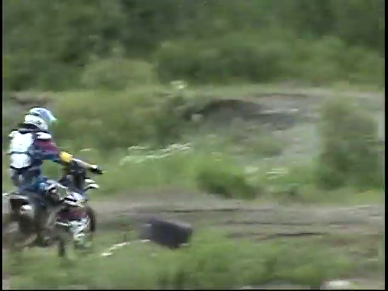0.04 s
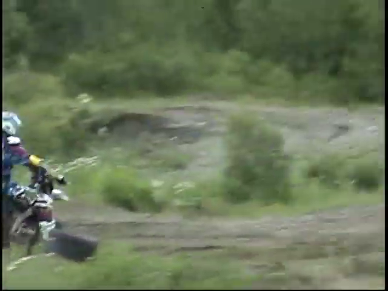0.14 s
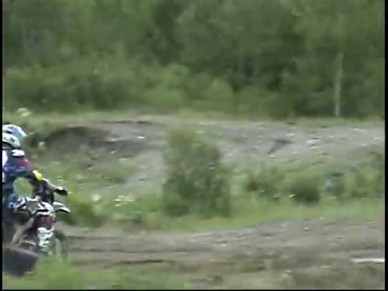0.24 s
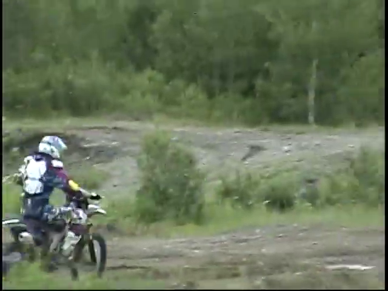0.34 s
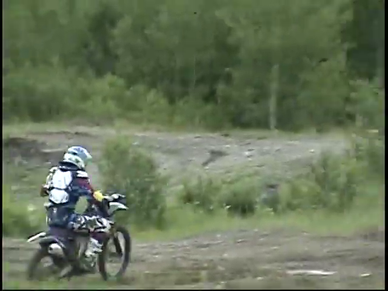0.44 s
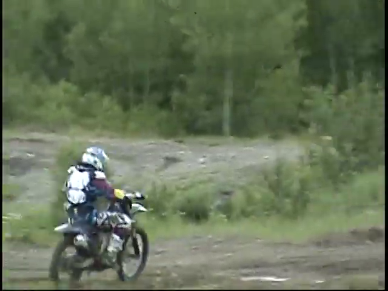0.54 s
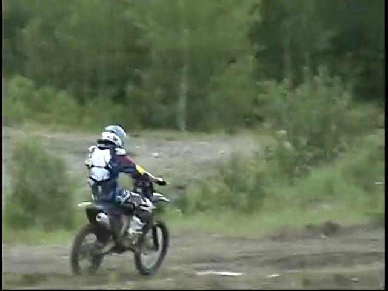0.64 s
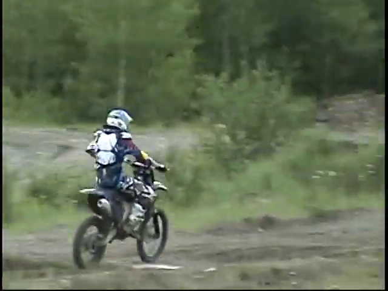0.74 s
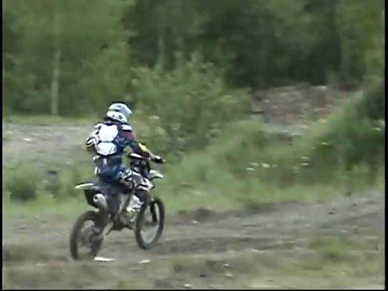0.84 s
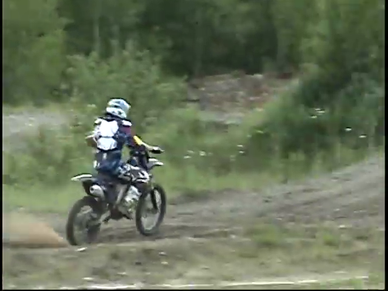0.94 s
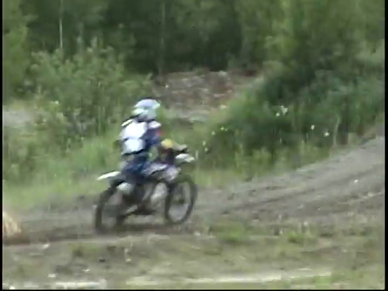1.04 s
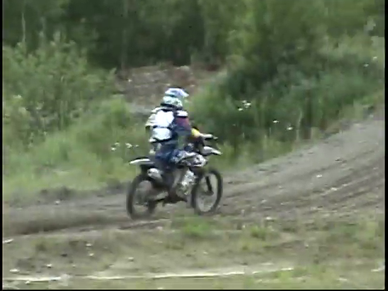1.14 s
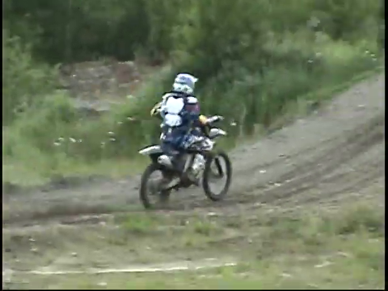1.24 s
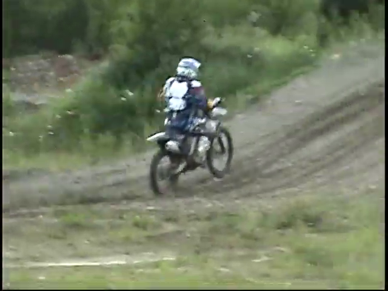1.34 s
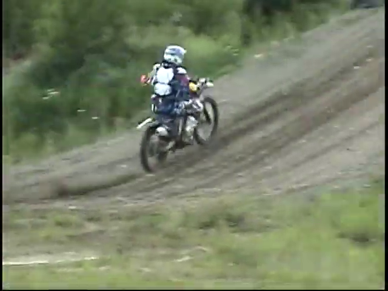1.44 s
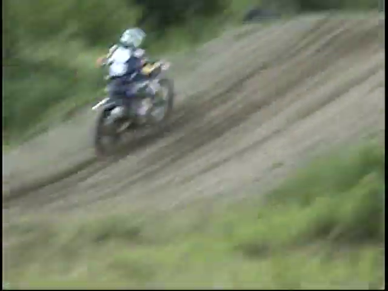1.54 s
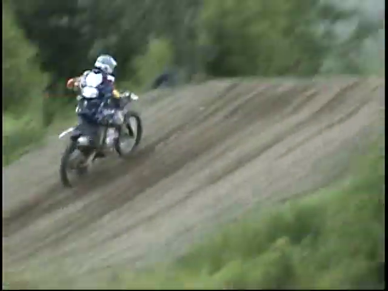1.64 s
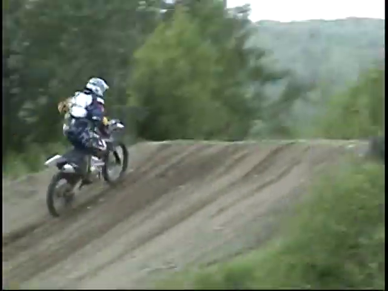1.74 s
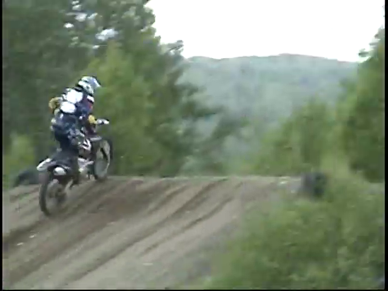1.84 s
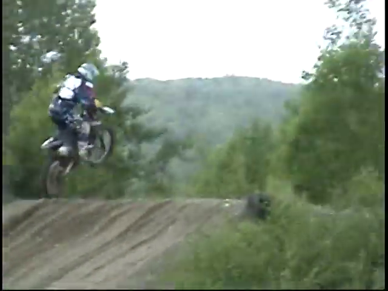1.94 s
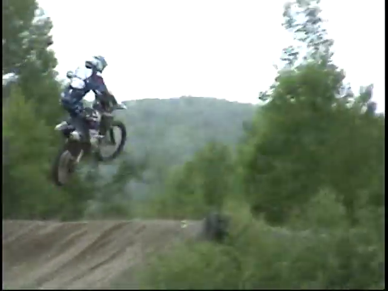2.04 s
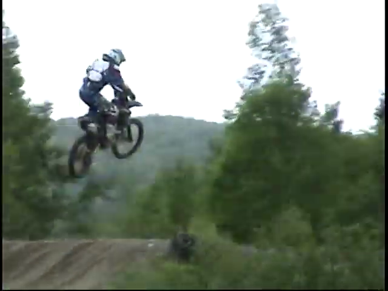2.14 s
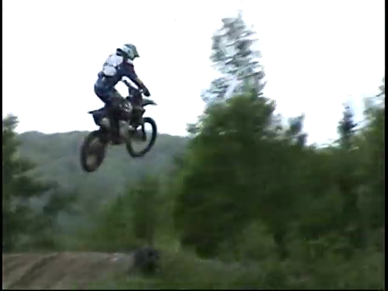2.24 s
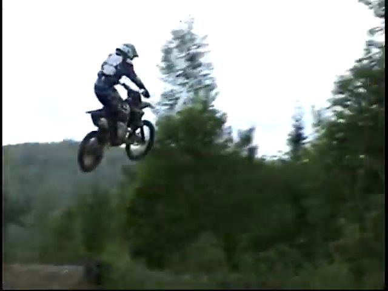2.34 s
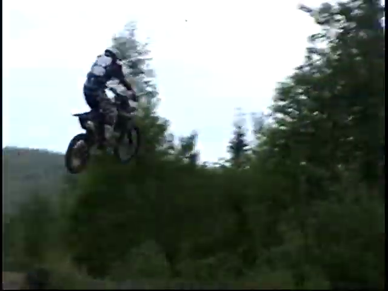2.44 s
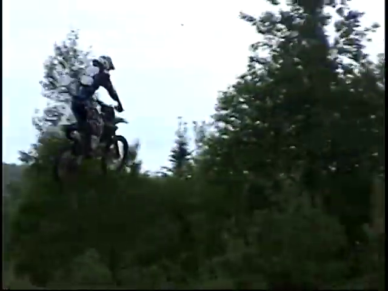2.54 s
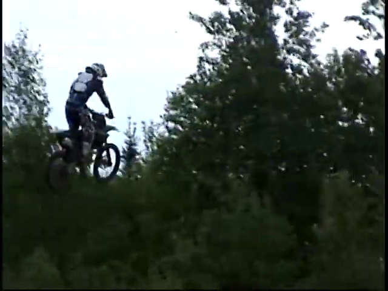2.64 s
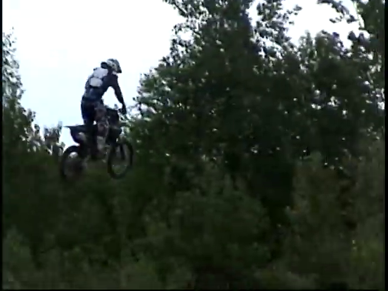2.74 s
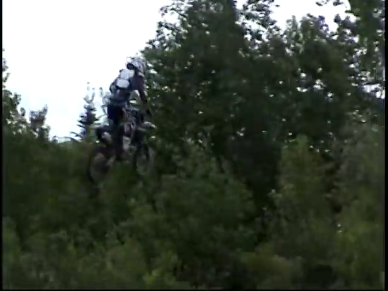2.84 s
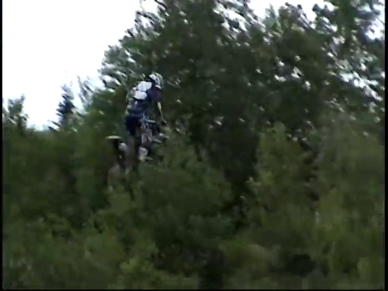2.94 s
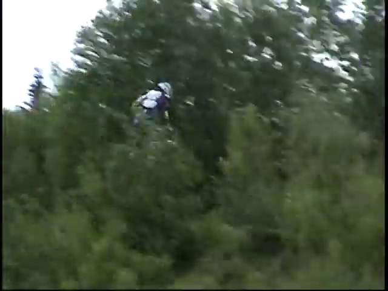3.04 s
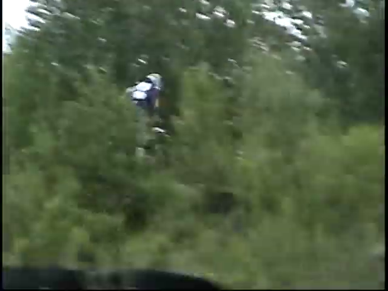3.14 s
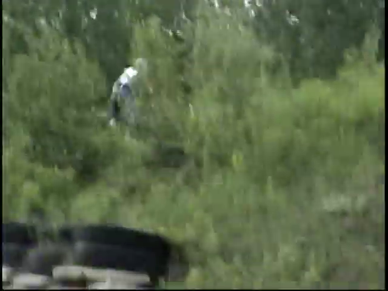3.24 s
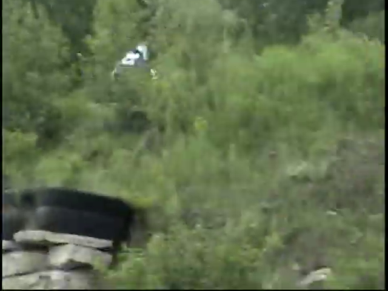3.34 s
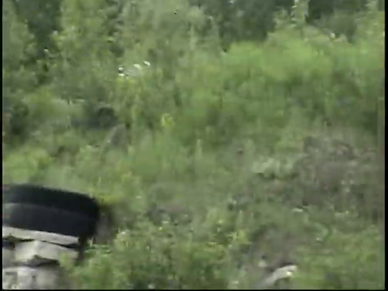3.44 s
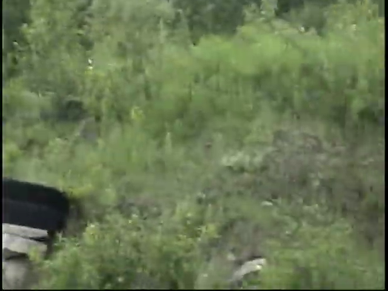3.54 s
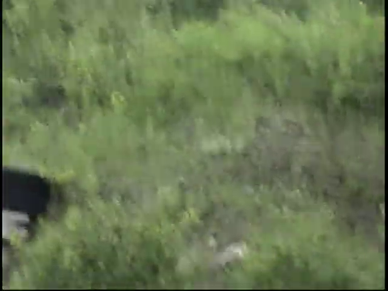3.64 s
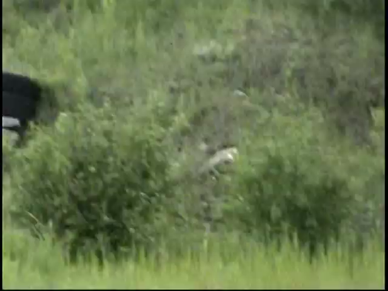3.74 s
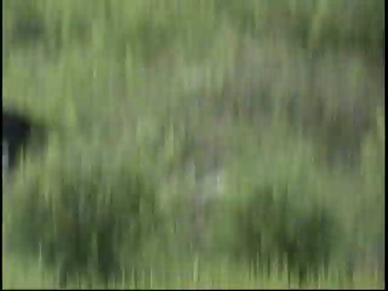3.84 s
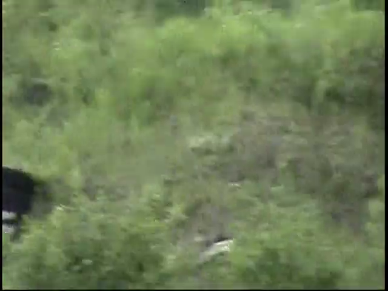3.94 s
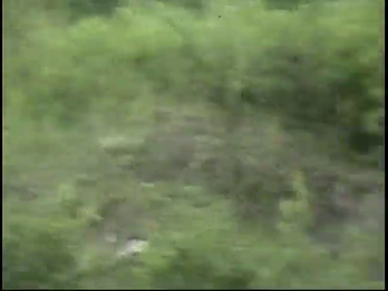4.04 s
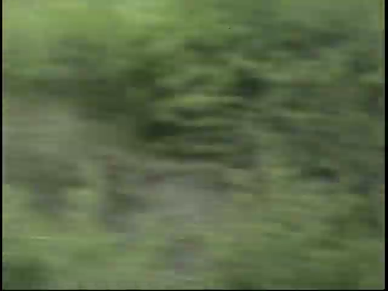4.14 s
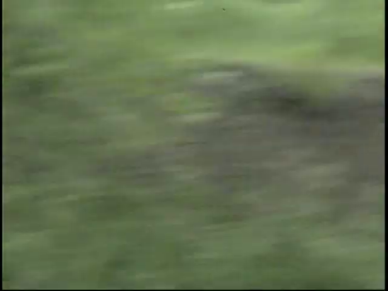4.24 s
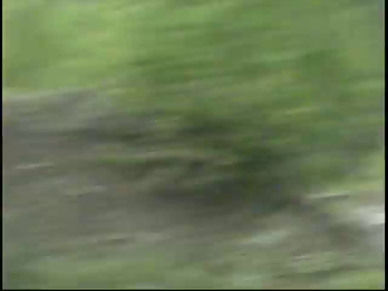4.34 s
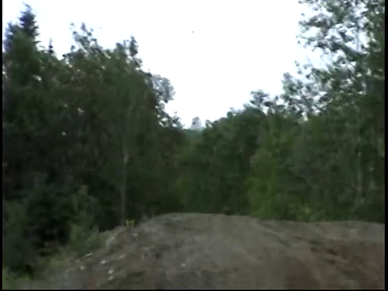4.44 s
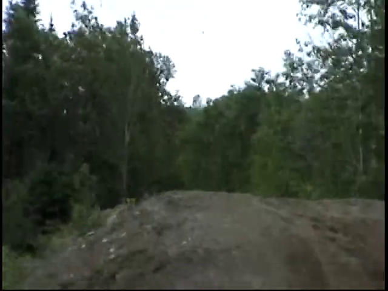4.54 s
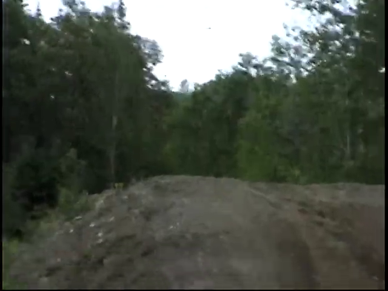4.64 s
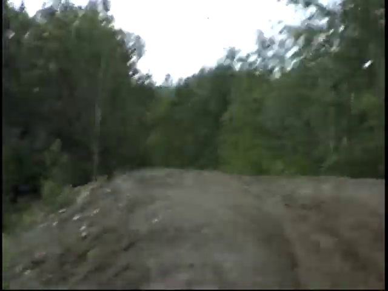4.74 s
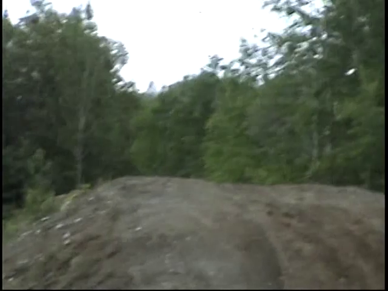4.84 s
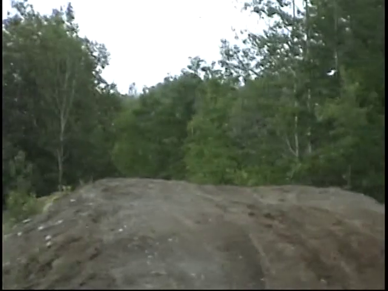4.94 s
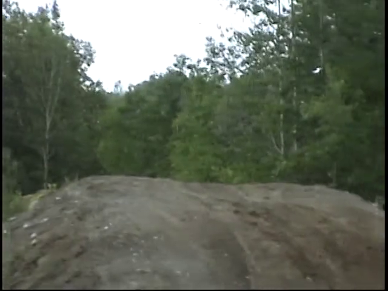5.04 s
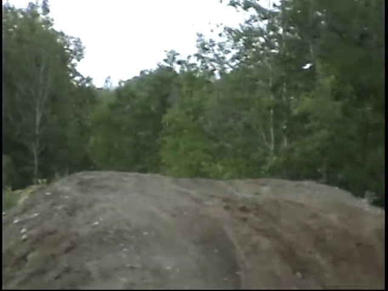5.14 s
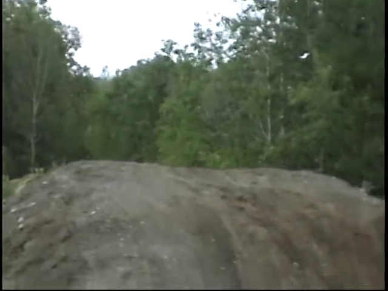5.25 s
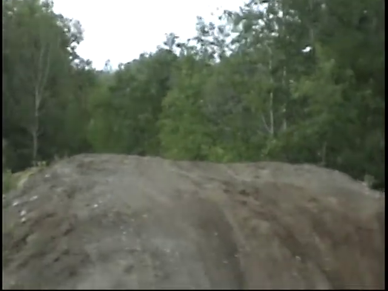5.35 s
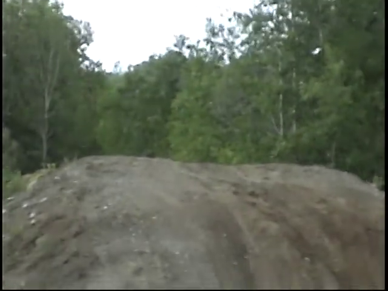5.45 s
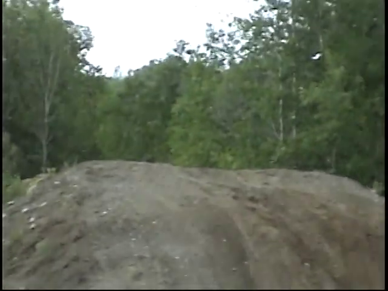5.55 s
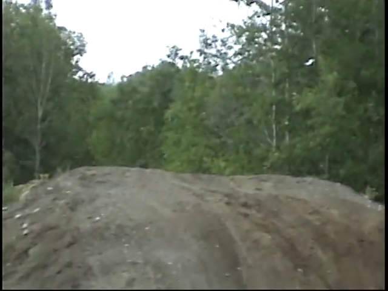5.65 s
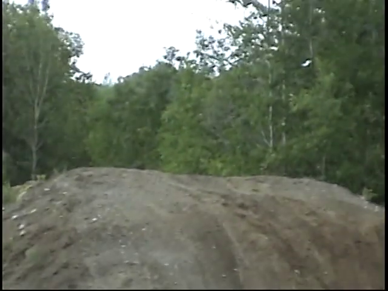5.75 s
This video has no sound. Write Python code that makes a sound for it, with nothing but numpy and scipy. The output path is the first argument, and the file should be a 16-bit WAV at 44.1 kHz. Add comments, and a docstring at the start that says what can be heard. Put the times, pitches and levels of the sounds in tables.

```python
"""A single-cylinder four-stroke dirt bike climbs a ramp over wind buffeting and camera hiss: each firing is a low
boom of summed orders from the silencer and a crack of filtered shock and turbulence from the tailpipe, and trees
answer with a roar of shaped noise. It jumps with the throttle shut, leaving soft pops, blips the throttle, then
coasts behind a bank as knocks of chain and frame, decaying sines with grit, mark a landing. After an edit it pulls
hard again, further off and mostly heard as scattered sound."""
import sys
import numpy as np
from scipy import signal
from scipy.fft import rfft, irfft, next_fast_len
from scipy.io import wavfile
from scipy.ndimage import uniform_filter1d, map_coordinates

SR = 44100
rng = np.random.default_rng(int(sys.argv[2]) if len(sys.argv) > 2 else 0)


def waveform_to_disk(signal):
    """Save audio, clipped to [-1, 1], as 16-bit WAV at the path in sys.argv[1]."""
    frames = np.transpose(np.atleast_2d(signal))
    scaled = np.clip(frames, -1, 1) * 32767
    samples = np.round(scaled).astype(np.int16)
    wavfile.write(sys.argv[1], SR, samples)


N = 256220
TIME = np.arange(N) / SR
SIZE = next_fast_len(N + 8192)  # spectrum length, padded so that ringing does not wrap round
HZ = np.fft.rfftfreq(SIZE, 1 / SR)
EDIT_S = 4.4  # from here on the bike is further off


def amp(db):
    """Logarithmic level: decibels to gain."""
    return 10 ** (np.asarray(db) / 20)


def steady(x, span=0.17):
    """Power normalisation: x with its running level over span seconds brought to rms 1."""
    width = int(span * SR)
    power = uniform_filter1d(uniform_filter1d(x ** 2, width), width)
    return x / np.sqrt(np.abs(power) + 1e-12)


def along(points):
    """Logarithmic frequency scale: (Hz, value) points interpolated over log frequency."""
    hz, value = np.transpose(points)
    return np.interp(np.log(HZ + 1), np.log(hz + 1), value)


def curves(rows):
    """Slow modulation: one interpolated value per sample for each column after the time."""
    s, *columns = np.transpose(rows)
    return [np.interp(TIME, s, column) for column in columns]


def filtered(x, response):
    """Linear filtering: the spectrum of x times a frequency response."""
    return irfft(rfft(x, SIZE) * response, SIZE)[..., :N]


def causal(points):
    """Causality: the minimum-phase response of a (Hz, dB) spectrum, so that pulses ring after they start."""
    cepstrum = irfft(np.log(amp(np.maximum(along(points), -50))), SIZE)
    # folding the cepstrum onto positive times gives minimum phase
    cepstrum[1:SIZE // 2] *= 2
    cepstrum[SIZE // 2 + 1:] = 0
    return np.exp(rfft(cepstrum))


def wobble(rate):
    """Random fluctuation: a smooth curve through rate random knots a second."""
    knots = rng.standard_normal(int(N * rate / SR) + 4)
    return map_coordinates(knots, [TIME * rate])


def spread(alike):
    """Interchannel coherence: left and right noises as alike as the 0-1 curve says."""
    turn = np.arccos(np.clip(alike, -1, 1)) / 2 * np.ones_like(HZ)
    shares = np.array([np.cos(turn), np.sin(turn)])
    mid, side = filtered(rng.standard_normal((2, N)), shares)
    return np.array([mid + side, mid - side])


def impulses(at_s, size):
    """Fractional delay: one impulse per time, shared between the two nearest samples."""
    at = np.clip(at_s * SR, 0, N - 2)
    before = at.astype(int)
    late = at - before
    return np.bincount(before, size * (1 - late), N) + np.bincount(before + 1, size * late, N)


# Engine speed. Each row: time in seconds, firings per second.
FIRING_RATE = [(0.0, 79.98), (0.05, 73.29), (0.1, 72.5), (0.2, 63.4), (0.25, 68.03), (0.35, 83.1),
               (0.4, 81.62), (0.52, 95.1), (0.58, 75.57), (0.63, 88.35), (0.69, 70.89), (0.77, 68.4),
               (0.95, 92.44), (1.07, 101.2), (1.2, 85.6), (1.25, 84.3), (1.3, 76.11), (1.4, 78.71),
               (1.46, 85.49), (1.51, 80.39), (1.58, 88.49), (1.64, 80.93), (1.8, 78.6), (1.95, 79.9),
               (2.0, 83.57), (2.17, 80.05), (2.22, 65.59), (2.3, 71.0), (2.55, 54), (3.1, 33.7),
               (3.2, 36.64), (3.27, 43.54), (3.33, 55.4), (3.47, 87.6), (3.5, 85.96), (3.53, 56.93),
               (3.57, 54.2), (3.64, 62), (4.0, 46.5), (4.17, 63), (4.22, 57), (4.39, 54), (4.41, 94.08),
               (4.45, 92.39), (4.5, 80.34), (4.66, 69), (4.8, 71), (5.0, 70.8), (5.07, 85.3), (5.13, 83.6),
               (5.18, 89.37), (5.24, 84.03), (5.32, 84.37), (5.38, 75.9), (5.45, 82), (5.5, 80.6),
               (5.6, 92.97), (5.7, 97.51), (5.81, 87)]
FIRST_FIRING = .12  # share of a cycle already turned at the start


def engine_cycle():
    """Phase as the integral of frequency: firing rate in Hz, cycles turned, and the time of each firing."""
    firing_hz, = curves(FIRING_RATE)
    cycle = FIRST_FIRING + np.cumsum(firing_hz) / SR
    fire_s = np.interp(np.arange(1, int(cycle[-1]) + 1), cycle, TIME)
    return firing_hz, cycle, fire_s


# Silencer response. Each row: frequency in Hz, relative level in dB close by, further off, with the throttle shut.
SILENCER_RESPONSE = [(40, -6, -21, -46), (77, -15.5, -14, -11), (100, -14, -10.5, -12.5),
                     (131, 1.5, -10, -5), (158, -6.5, -2, 3.5), (244.5, 2, 1.5, -6.5),
                     (281.5, -1, -4, -9.5), (329.6, -4, -11, -18), (379, -8, -21, -20.5),
                     (490, -21.5, -27, -33), (970, -97, -70, -60)]
# Turbulence under the boom. Each row: frequency in Hz, relative level in dB per Hz.
BOOM_TURBULENCE = [(35, -54), (60, -12), (107, -10.5), (150, -2.5), (265, -1), (411, -12), (560, -17),
                   (730, -51), (1230, -120)]
SHIMMER_DB = 1.3  # each order wavers on its own


def boom(firing_hz, cycle, throttle, tilt_db, count=7):
    """Harmonic series: the silencer passes low firing orders, which meet in one pressure dip a cycle."""
    hz, near_db, far_db, shut_db = np.transpose(SILENCER_RESPONSE)
    log_order = np.log(np.arange(1, count + 1)[:, None] * firing_hz)
    near, far, shut = (np.interp(log_order, np.log(hz), db) for db in (near_db, far_db, shut_db))
    open_db = np.where(TIME > EDIT_S, far, near)
    octaves = log_order / np.log(2)
    gains = amp(throttle * open_db + (1 - throttle) * shut + tilt_db * octaves)
    gains = gains / np.sqrt(np.sum(gains ** 2, axis=0))  # the orders together keep one level
    flutter = 0.0088 * wobble(60)  # cycles
    # further off, an echo from the bank staggers the odd orders and fills the gap between dips
    stagger = 0.29 * (TIME > EDIT_S)
    tone = 0
    for order, gain in enumerate(gains, start=1):
        turn = .75 if order == 1 else .56 - stagger * (order % 2)
        shimmer = amp(SHIMMER_DB * wobble(16))
        wave = np.cos(2 * np.pi * (order * (cycle + flutter) + turn))
        tone = tone + np.sqrt(2) * gain * shimmer * wave
    turbulence = steady(filtered(spread(0.69), amp(along(BOOM_TURBULENCE))))
    return tone + amp(-12.5) * turbulence


def shock_pulses(fire_s, chance):
    """Shock and ground reflection: front times, their sizes, fronts, duller bounces, turbulent bursts."""
    front_s = fire_s - .0019 + .00003 * chance[:, 0]  # just ahead of the dip
    size = amp(0.86 * chance[:, 1])
    front = impulses(front_s, size)
    # the bounce path drifts as the bike moves, which slides the colour of the bark
    path_s = 0.00148 + .00007 * np.interp(fire_s, TIME, wobble(5))
    bounce_s = front_s + path_s + .00004 * chance[:, 2]
    bounce = impulses(bounce_s, size * (0.41 + 0.064 * chance[:, 3]))
    decay = amp(-60 * TIME[:1500] / 0.011)  # 60 dB in 11 ms
    burst = signal.fftconvolve(front, decay)[:N] * rng.standard_normal(N)
    return front_s, size, front, bounce, burst


# Tailpipe resonances. Each row: centre in Hz, width in Hz, relative level in dB.
PIPE_RESONANCES = [(730, 72, -14), (1456, 570, -1.5), (2253, 300, 1), (3130, 1700, -4), (4340, 240, -7)]


def tailpipe():
    """Resonance: parallel second-order modes, with lows and highs rolled off."""
    modes = sum(amp(db) * 1j * HZ * width / (centre * centre - HZ * HZ + 1j * HZ * width)
                for centre, width, db in PIPE_RESONANCES)
    low_cut = (1j * HZ / (350 + 1j * HZ)) ** 2
    high_cut = (6500 / (6500 + 1j * HZ)) ** 4
    return modes * low_cut * high_cut


# Scattered sound. Each row: frequency in Hz, left-right likeness (0-1).
SCATTER_LIKENESS = [(60, .8), (300, 1), (3000, 1), (7000, 0.81), (15000, 0.057)]


def scattered_noise(cycle):
    """Multiple scattering: diffuse noise keeps a faint pulse at the firing rate."""
    throb = 1 + 0.098 * np.cos(2 * np.pi * (cycle - .05))
    waver = amp(1.1 * wobble(26) + 0.6 * wobble(40))
    return spread(along(SCATTER_LIKENESS)) * throb * waver


# Roar with the throttle open. Each row: frequency in Hz, relative level in dB per Hz.
OPEN_ROAR = [(240, -37), (400, -10.5), (525, -18.5), (666, -0.5), (835, -2), (1040, -6.5), (1310, -3.5),
             (1740, -11.5), (2290, -8), (2680, -10.5), (3520, -5.5), (6000, -10.5), (7800, -14),
             (13200, -120)]
# Colour of pops and roar with the throttle shut. Each row: frequency in Hz, relative level in dB per Hz.
SHUT_ROAR = [(190, -42), (330, 0.5), (416, -1), (452, -6), (475, -8), (651, 0), (781, -5.5), (1030, -12.5),
             (3000, -19.5), (3350, -15.5), (6000, -26), (7800, -67), (13200, -120)]
# The pipe's spectral valleys between throat, growl, bark and rasp. Each entry: frequency in Hz.
BAND_VALLEYS = [1000, 1750, 2700]
UNEVEN_DB = 2  # each pipe band varies on its own from firing to firing
ROUGHNESS = (0.017, 0.022, 0.14, 0.11)  # gain of the burst in throat, growl, bark, rasp


def crack(levels_db, scatters, throttle, fire_s, shock, burst, diffuse):
    """Superposition of direct and diffuse fields: throat, growl, bark and rasp of the tailpipe crack."""
    below = [1 / (1 + (HZ / hz) ** 8) for hz in BAND_VALLEYS]
    bands = np.diff([0 * HZ, *below, 1 + 0 * HZ], axis=0)
    shock_z, burst_z, diffuse_z = (rfft(x, SIZE) for x in (shock, burst, diffuse))
    pipe, roar_open, roar_shut = tailpipe(), causal(OPEN_ROAR), causal(SHUT_ROAR)

    def by_throttle(spectrum, open_colour):
        """Crossfade of spectra: a shut throttle leaves soft pops without the shock's edge."""
        opened = steady(irfft(spectrum * open_colour, SIZE)[..., :N])
        shut = steady(irfft(spectrum * roar_shut, SIZE)[..., :N])
        return throttle * opened + (1 - throttle) * shut

    sound = 0
    for db, band, scatter, rough in zip(levels_db, bands, scatters, ROUGHNESS):
        direct = by_throttle((shock_z + rough * burst_z) * band, pipe)
        roar = by_throttle(diffuse_z * band, roar_open)
        uneven = amp(UNEVEN_DB * np.interp(TIME, fire_s, rng.standard_normal(len(fire_s))))
        sound = sound + amp(db) * (np.sqrt(1 - scatter) * uneven * direct + np.sqrt(scatter) * roar)
    return sound


# Top of the crack. Each row: frequency in Hz, relative level in dB per Hz.
SIZZLE_SPECTRUM = [(3500, -25), (5000, -0.5), (6000, -2.5), (7000, -2.5), (7800, -5), (8500, -2),
                   (9800, -3.5), (11800, -13), (13500, -25.5), (16400, -83)]


def sizzle(front_s, size, chance, burst, diffuse, scatter):
    """Air absorption: the top of the crack varies most between firings and dulls when scattered."""
    spark = impulses(front_s, size * amp(2.5 * chance)) + .35 * burst
    top = causal(SIZZLE_SPECTRUM)
    air = 1 / (1 + (HZ / 10500) ** 4)  # longer paths lose treble
    direct = steady(filtered(spark, top))
    scattered = steady(filtered(diffuse, top * air))
    return np.sqrt(1 - scatter) * direct + 1.59 * np.sqrt(scatter) * scattered


# Force of the firings. Each row: time in seconds, force in dB.
FIRING_FORCE = [(0.0, -33.5), (0.12, -38.5), (0.38, -37), (0.52, -39), (0.57, -40.5), (0.63, -37.5),
                (0.7, -41), (0.85, -35.5), (1.15, -33), (1.3, -37.5), (1.66, -34.5), (1.8, -35.5),
                (1.9, -42.5), (2.0, -31), (2.14, -29), (2.2, -50.5), (2.3, -54), (2.8, -67.5), (3.21, -67),
                (3.24, -39.5), (3.4, -29.5), (3.475, -33), (3.49, -47.5), (3.51, -52), (3.75, -55),
                (4.1, -69.5), (4.39, -74.5), (4.41, -30), (4.8, -36), (5.15, -33.5), (5.5, -35.5),
                (5.81, -31)]
# Levels of the engine's bands at full force, changing over time. Each row: time in seconds, boom in dB,
# boom tilt in dB per octave, throat in dB, growl in dB, sizzle in dB, share hidden by trees and bank (0-1).
BAND_LEVELS = [(0, -28, -3, -42.5, -37, -38, 0.05), (0.1, -26.5, -0.5, -39, -30, -40, .08),
               (0.2, -26, 5, -33.5, -27, -36, 0.08), (0.4, -25.5, -2.5, -37.5, -33.5, -33, .08),
               (0.6, -21.5, 1.5, -37.5, -30, -39.5, 0.09), (0.75, -24, 1, -34, -34, -32, 0.08),
               (1.1, -26.5, -0.7, -48.5, -29, -40, .07), (1.2, -26, 2, -41, -38, -36, 0.1),
               (1.5, -25, 0.3, -37.5, -34, -35.5, 0.08), (1.7, -27, 0.5, -48.5, -39, -40, .1),
               (1.95, -27.5, 0.5, -50, -37, -52.5, 0.15), (2.14, -27.5, -5, -42.5, -37, -53, 0.12),
               (2.3, -29.5, 5.5, -33, -30.5, -40, 0.3), (2.7, -26, -3.5, -34, -36, -50, 0.54),
               (3.2, -29.5, -13, -41.5, -34.5, -43, 0.1), (3.25, -34.5, 0, -40.5, -44, -48, 0.03),
               (3.33, -32, 1.5, -33, -42.5, -49.5, 0.05), (3.46, -32, -5, -45, -34.5, -49.5, 0.05),
               (3.7, -32, -5, -36, -39.5, -44, 0.83), (4.39, -23, -2, -31.5, -37, -49, 1),
               (4.41, -31.5, -4, -43.5, -37.5, -51, 0.78), (4.55, -31.5, -0.8, -48.5, -35.5, -53, 0.61),
               (4.7, -29, -1.5, -43, -36.5, -48, 0.63), (5.0, -29.5, 1, -40, -39.5, -48, 0.86),
               (5.2, -28.5, 0.5, -40.5, -34.5, -50, 0.91), (5.81, -29.5, 4, -43, -34, -50.5, 0.88)]
# Rasp over the bark. Each row: time in seconds, level in dB.
RASP_OVER_BARK = [(0, 2), (0.25, 7), (0.45, 9.5), (0.6, 3.5), (0.8, 5), (0.97, 1), (1.15, 1.5), (1.7, 0.5),
                  (1.85, -2), (2.05, -7), (2.15, -4.5), (2.5, 2.5), (3.3, 0.5), (3.5, 0), (4.4, -3.5),
                  (4.7, 0), (5.81, -1)]
# Scattered share of the soft pops. Entries: throat, growl, bark, rasp (each 0-1).
POP_SCATTER = [.2, .4, .75, .8]
FULL_DB, SHUT_DB, OPENS_DB = -33, -52.5, 15  # force flat out; throttle shut below; fully open this much higher
BARK_DB = -4.5  # bark under the force
BOOM_FOLLOWS, GROWL_FOLLOWS, SIZZLE_FOLLOWS = 0.5, 0.74, 1.27  # dB per dB of force


def engine():
    """Periodic excitation: boom, crack and sizzle at each firing, partly scattered by trees and bank."""
    firing_hz, cycle, fire_s = engine_cycle()
    force_db, = curves(FIRING_FORCE)
    boom_db, tilt_db, throat_db, growl_db, sizzle_db, hidden = curves(BAND_LEVELS)
    under_db = force_db - FULL_DB
    throttle = np.clip((force_db - SHUT_DB) / OPENS_DB, 0, 1)
    scatters = [np.clip(1 - (1 - hidden) * (1 - share * (1 - throttle)), 0, 1) for share in POP_SCATTER]

    chance = rng.standard_normal((len(fire_s), 5))  # each firing differs
    front_s, size, front, bounce, burst = shock_pulses(fire_s, chance)
    diffuse = scattered_noise(cycle)

    bark_db = force_db + BARK_DB
    levels_db = (throat_db + GROWL_FOLLOWS * under_db, growl_db + GROWL_FOLLOWS * under_db,
                 bark_db, bark_db + curves(RASP_OVER_BARK)[0])
    low = amp(boom_db + BOOM_FOLLOWS * under_db) * boom(firing_hz, cycle, throttle, tilt_db)
    middle = crack(levels_db, scatters, throttle, fire_s, front + bounce, burst, diffuse)
    high = sizzle(front_s, size, chance[:, 4], burst, diffuse, scatters[-1])
    return low + middle + amp(sizzle_db + SIZZLE_FOLLOWS * under_db) * high


# Buffeting strength. Each row: time in seconds, level in dB.
WIND_LEVEL = [(0, -57), (0.15, -67), (1.9, -76), (2.1, -57), (3, -64), (3.2, -52), (3.6, -60), (4.05, -57),
              (4.2, -48), (4.45, -46), (4.75, -48), (5, -44), (5.4, -44.5), (5.81, -43)]
# Wind colour. Each row: frequency in Hz, relative level in dB per Hz.
WIND_SPECTRUM = [(12, -26), (25, 10), (42, 3.5), (70, 6), (110, -3), (200, -42)]


def wind():
    """Turbulent pressure: low lumpy buffeting, partly different at each microphone port."""
    lumps = amp(3.5 * wobble(9))
    rumble = filtered(spread(0.39), amp(along(WIND_SPECTRUM)))
    return amp(curves(WIND_LEVEL)[0]) * steady(lumps * rumble, span=0.23)


# Camera noise. Each row: frequency in Hz, relative level in dB per Hz.
HISS_SPECTRUM = [(1800, -2), (3000, -3.5), (9000, -15.5), (12000, -27), (14500, -32), (16400, -36)]


def hiss():
    """Stationary noise and a pure tone: camera hiss and a faint line-scan whistle."""
    noise = steady(filtered(spread(0.74), amp(along(HISS_SPECTRUM))), span=1)
    whistle = np.sin(2 * np.pi * 15734 * TIME)
    return amp(-62) * noise + amp(-93) * whistle


# Knocks of chain and frame. Each row: start in seconds, starting level in dB, pitch in Hz.
KNOCKS = [(3.115, -45, 895), (3.66, -45, 9300), (3.694, -37, 3920), (3.719, -26.5, 614),
          (3.728, -46.5, 7940)]


def ticks():
    """Damped vibration: short broad knocks, a few cycles each."""
    out, t = np.zeros(N + 800), TIME[:800]
    for start_s, db, hz in KNOCKS:
        # higher ticks die sooner and carry more grit
        grit = hz / 9000 * rng.standard_normal(len(t))
        decay_s = 0.0037 + 6 / hz  # time to fall 60 dB
        knock = amp(db - 60 * t / decay_s) * (np.sin(2 * np.pi * hz * t) + grit)
        first = round(start_s * SR)
        out[first:first + len(t)] += knock
    return out[:N]


def scene():
    """Linear superposition: every source summed at the two microphone ports."""
    return engine() + wind() + hiss() + ticks()


# Unequal ports. Each row: frequency in Hz, left minus right in dB.
PORT_BALANCE = [(60, -0.6), (150, 1.4), (380, 0.5), (950, 2), (2380, 3.5), (5980, 2.5), (15000, -2.5)]
# Fade across the edit. Each row: time in seconds, gain in dB.
EDIT_FADE = [(4.385, 1), (4.397, -40), (4.408, -52), (4.413, -12), (4.43, 1)]
TOP_HZ = 16400  # nothing passes from here up


def record(dry):
    """Linear reception: the fade at the edit, then unequal ports and the band limit."""
    ports = amp(along(PORT_BALANCE) * np.array([[.5], [-.5]]))
    return filtered(dry * amp(curves(EDIT_FADE)[0]), ports * (HZ < TOP_HZ))


dry = scene()
out = record(dry)
waveform_to_disk(out)
```